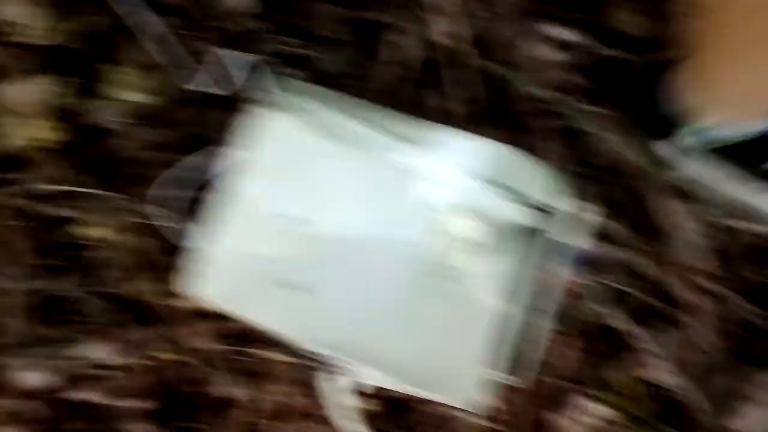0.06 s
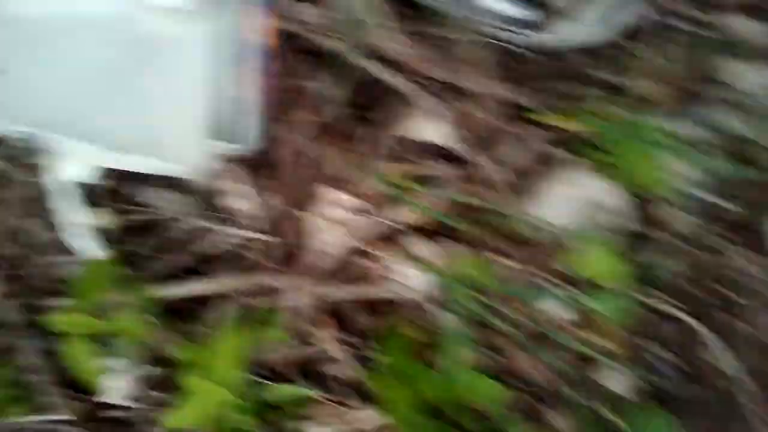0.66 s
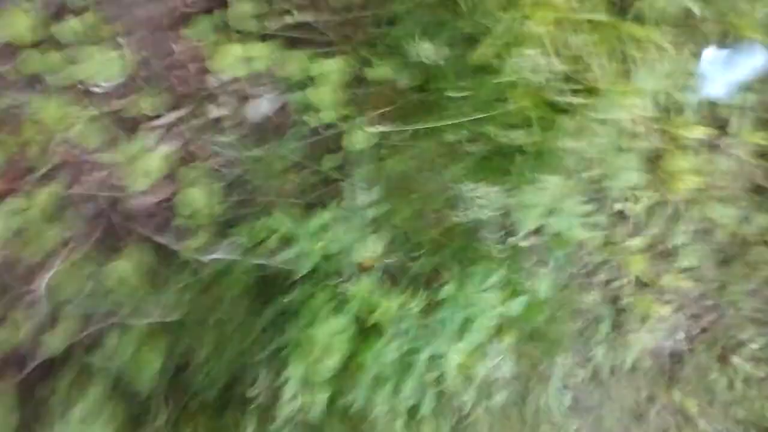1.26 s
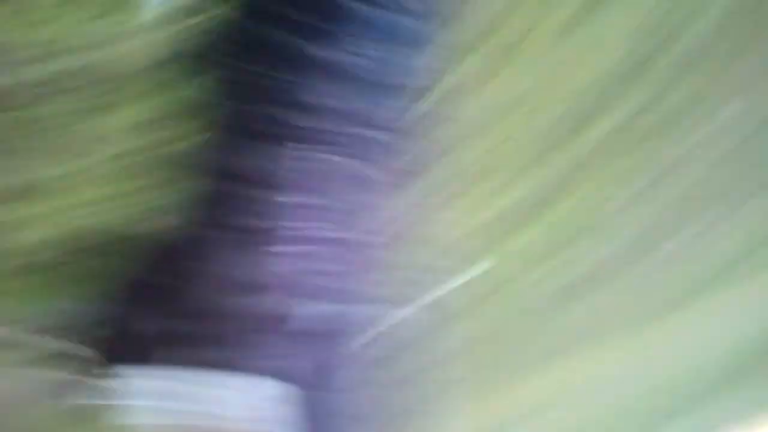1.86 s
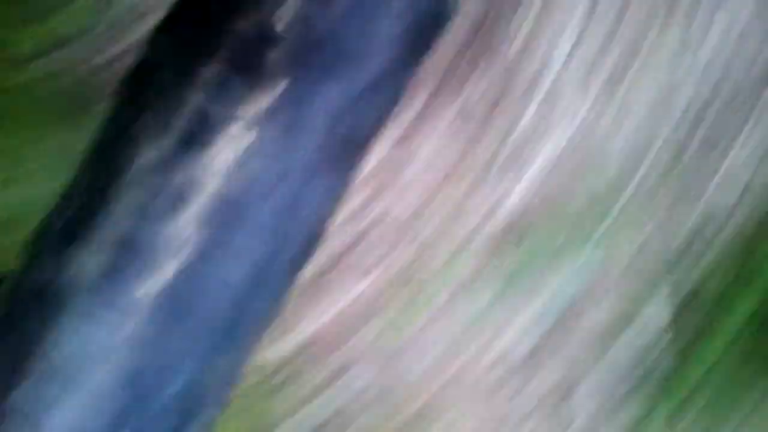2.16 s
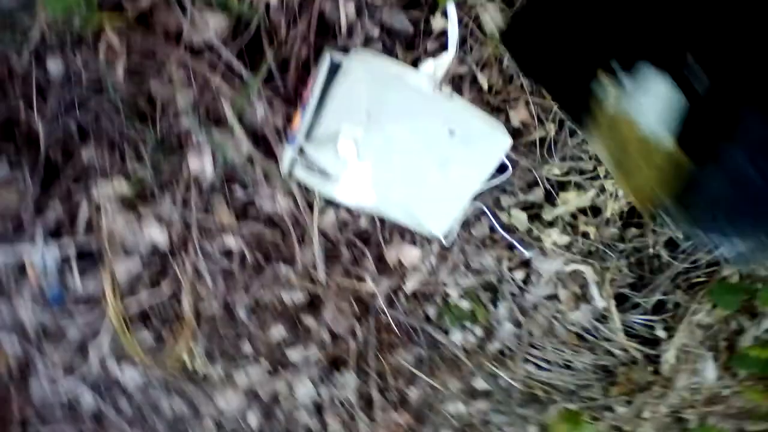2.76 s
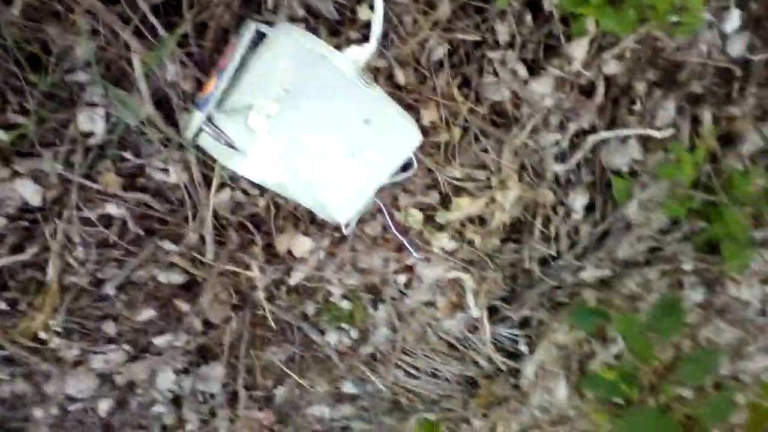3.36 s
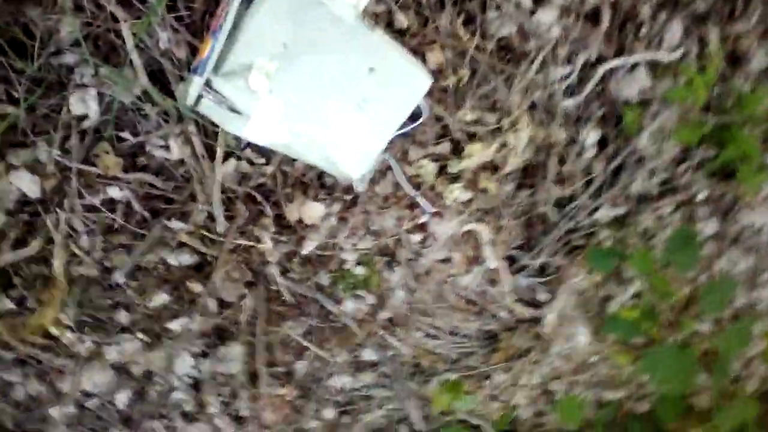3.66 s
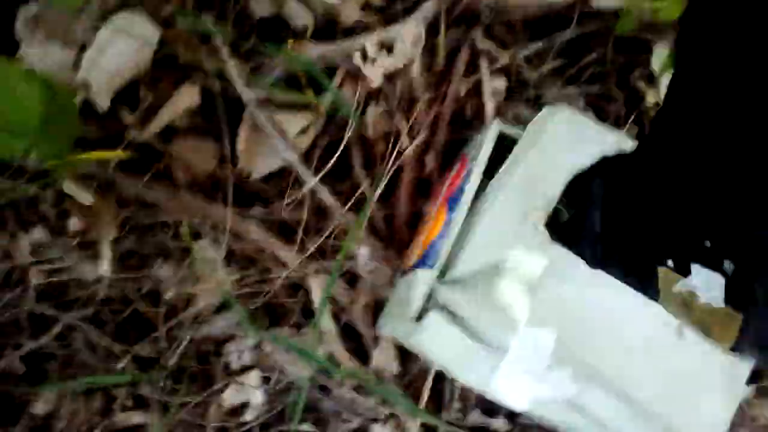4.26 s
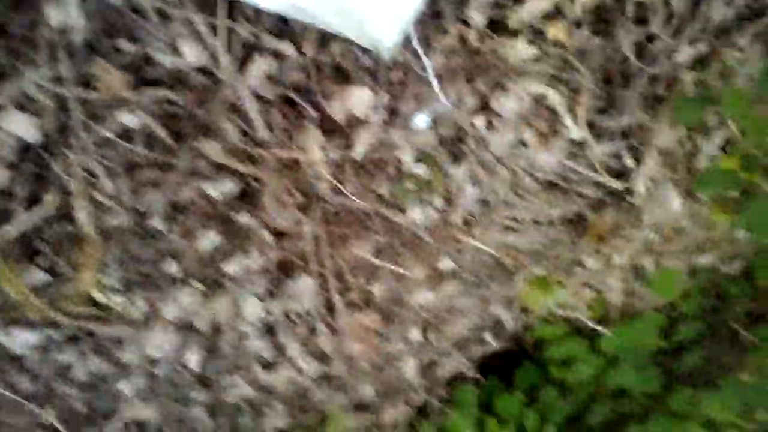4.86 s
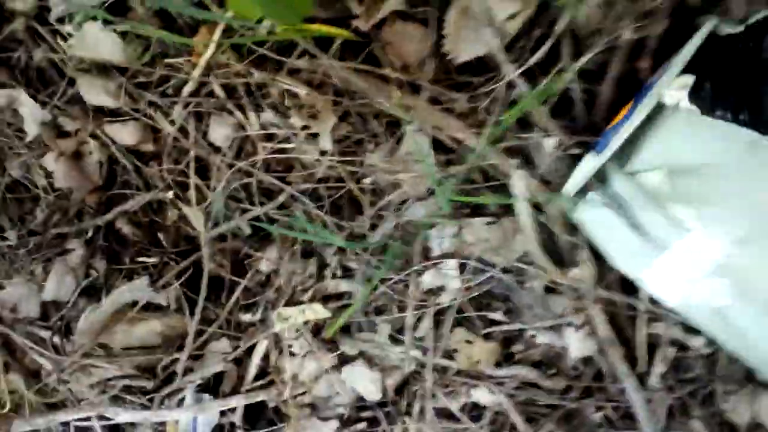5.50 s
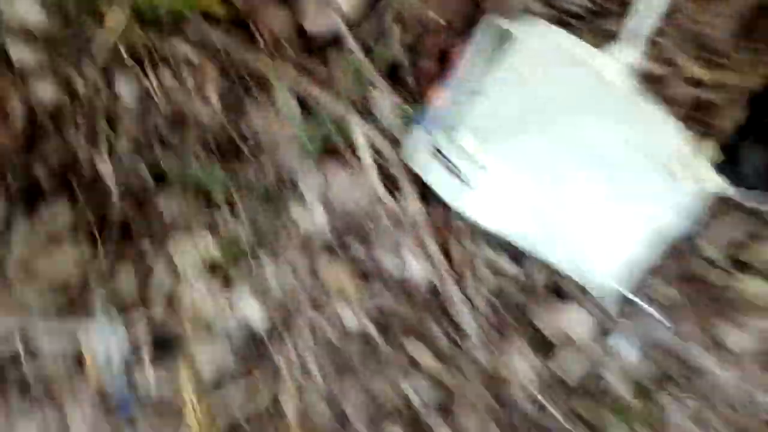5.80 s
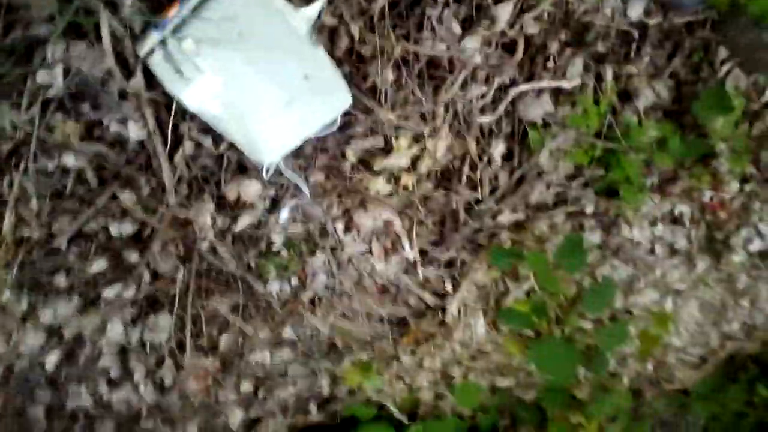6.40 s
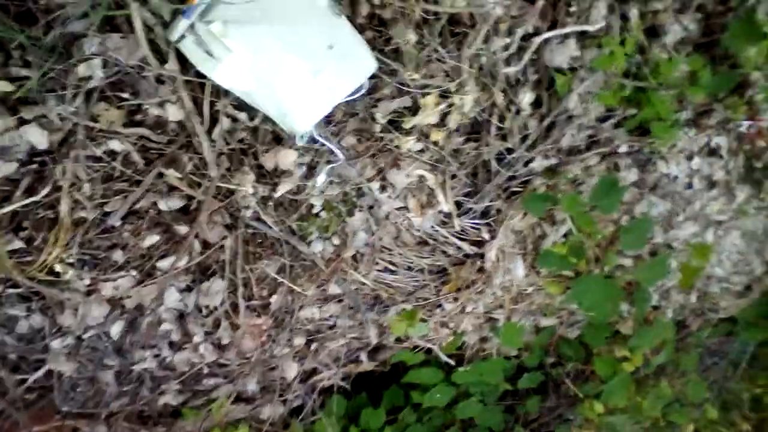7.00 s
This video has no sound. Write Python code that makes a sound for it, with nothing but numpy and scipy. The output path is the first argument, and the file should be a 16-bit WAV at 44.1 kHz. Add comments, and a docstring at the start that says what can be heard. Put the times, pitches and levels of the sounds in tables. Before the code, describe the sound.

After crunching leaves and snapping twigs, two hard cracking stick blows send a hollow box rattling over the ground, with faint traffic behind.

```python
"""A thin-walled box on the ground is struck twice with a stick: its wall buckles, thumps and cracks,
and its damped modes ring. It skids and rattles over the leaf litter and knocks lightly as it settles.
Before the blows, footsteps crackle in dry leaves and snap twigs, and a few dull taps of wood follow.
Trees scatter a short echo, far traffic hums behind them, and a limiter ducks around the two blows."""
import sys
import numpy as np
from scipy import signal
from scipy.fft import rfft, irfft
from scipy.io import wavfile
from scipy.ndimage import uniform_filter1d, minimum_filter1d

SR = 44100
rng = np.random.default_rng(int(sys.argv[2]) if len(sys.argv) > 2 else 0)


def materialize(psi):
    """Save the field psi as 16-bit PCM at rate SR to the path in sys.argv[1].

    A 1-D psi becomes a single channel; in a 2-D psi each row is a channel.
    """
    bounded = np.clip(np.atleast_2d(psi).T, -1, 1)
    quanta = np.round(bounded * 32767).astype(np.int16)
    wavfile.write(sys.argv[1], SR, quanta)


N = 310498

# Far traffic. Each row: time in seconds, engine rumble in dB, tyre rush in dB before a 1 dB lift.
TRAFFIC_LEVELS = [(0, -47.5, -48.5), (.9, -46.5, -47.5), (1.7, -43.5, -45), (2.5, -48.5, -46.5),
                  (3.8, -48.5, -45), (5, -48, -46.5), (7.04, -47.5, -46)]
# Spectra of engine rumble and tyre rush. Each row: frequency in Hz, relative density in dB.
RUMBLE_SPECTRUM = [(22, -14), (38, -23), (52, -31), (72, -4), (95, -2.5), (128, -1.5), (165, -2.5),
                   (270, -5), (350, -11), (550, -25), (1200, -71)]
TYRE_SPECTRUM = [(200, -20), (400, -4.5), (700, 1.5), (1050, 2.5), (1450, -2.5), (2000, -9.5),
                 (3000, -20.5), (6000, -36)]
# Single engines. Each row: start and length in seconds, pitch in Hz, glide in Hz a second, level in dB.
ENGINE_DRONES = [(0, 0.61, 134, 8, -46.5), (1.002, 1.95, 120, 6.5, -50), (3, 3.2, 120.9, 6.5, -48.5),
                 (5.403, 1.32, 116.6, -11.5, -48), (6.201, 1.2, 296.5, -10, -50.5)]
# Echo among the trees. Each row: frequency in Hz, time to decay 60 dB in seconds.
ECHO_DECAY = [(150, 0.046), (600, 0.42), (1200, 0.41), (3000, 0.32), (8000, 0.39)]
# Footsteps. Each row: time of full weight in seconds, level in dB, rise and fall in seconds.
FOOTSTEPS = [(.255, -33.5, 0.056, 0.12), (.415, -30.5, .006, 0.069), (1.28, -47, 0.087, 0.089)]
# Spectra of leaf litter and breaking wood. Each row: frequency in Hz, relative density in dB.
LEAF_SPECTRUM = [(80, -41), (250, -6.5), (600, -5.5), (1150, -2.5), (1700, -6.5), (2400, -3), (3300, -1),
                 (4300, -11.5), (6500, -11), (11000, -13.5), (15500, -17)]
SPLINTER_SPECTRUM = [(80, -36), (300, -17), (700, -4), (1200, -1), (1700, -2.5), (2300, 6.5), (2850, -1),
                     (3450, 1.5), (4400, -6.5), (6500, -8.5), (11000, -16), (15500, -20)]
# Twigs. Each row: start in seconds, level in dB, splinter time in seconds, tilt in dB an octave.
TWIG_SNAPS = [(.2795, -32.5, .0022, 5), (.301, -31.5, 0.0042, 1), (.327, -44, 0.0018, 1),
              (.383, -35, 0.0011, 7), (.4056, -17.5, 0.002, .5), (.4264, -28.5, .0023, -6),
              (.446, -30, 0.0025, 3), (.479, -34, 0.0029, -7.5), (.515, -43, .0018, 5),
              (.608, -36.5, 0.0084, -1.5), (.68, -47.5, 0.0036, -1), (.893, -41, 0.0025, 4.5),
              (1.082, -42.5, 0.0023, 2.5), (1.159, -31.5, 0.0079, -9), (1.169, -38, 0.0026, 4)]
# Dull taps of wood. Each row: start in seconds, level in dB, pitch in Hz.
WOOD_TAPS = [(2.403, -42.5, 480), (3.414, -47, 2190), (3.836, -42, 585), (3.953, -34, 610)]
# Wall and cavity modes. Each row: frequency in Hz, level in dB, time to decay 60 dB in seconds.
BOX_MODES = [(314, -12, 0.032), (384, -17, 0.15), (461, -8, 0.085), (529.4, -3, 0.16), (618, 3, 0.026),
             (746, 0, 0.045), (810, -11, 0.29), (868, -4, 0.07), (927, 1.5, 0.03), (992, -7, 0.22),
             (1078, -4.5, 0.11), (1204, -0.5, 0.042), (1312, -2.5, 0.048), (1540, -16, 0.053),
             (1600, -9, 0.026), (1833, -14.5, 0.1), (2080, -37, 0.17), (2520, -27, 0.13), (2720, -46, 0.06),
             (2720, -20, 0.036), (3470, -15.5, 0.038)]
# Spectra of the pressed-in wall and sharp contact. Each row: frequency in Hz, relative density in dB.
THUMP_SPECTRUM = [(50, -76), (120, -21), (195, -4.5), (260, -10), (360, -8), (520, -8), (1200, -48),
                  (6000, -90)]
CRACK_SPECTRUM = [(300, -76), (900, -2.5), (1500, -3.5), (2250, 0.5), (2550, -2.5), (3050, -1),
                  (3600, -8.5), (4300, -16), (6500, -21), (9000, -28.5), (15500, -43)]
# The box sliding. Each row: start in seconds, level in dB, length in seconds,
# scratch in dB relative to the ring.
BOX_SKIDS = [(4.101, -31, 0.096, -5.5), (4.452, -39, 0.034, -4.5), (5.304, -23.5, 0.19, -14.5),
             (5.662, -43, 0.052, -4)]
# The box landing. Each row: start in seconds, level in dB, crumple time in seconds,
# crack in dB relative to the ring.
BOX_LANDINGS = [(4.135, -31, 0.0079, 1), (4.16, -25.5, 0.0042, -4), (4.181, -30.5, 0.01, -24),
                (4.4397, -26, 0.025, -8), (5.3437, -17, .012, -14), (5.4343, -15.5, .009, -17),
                (5.485, -23, 0.012, -21), (5.513, -28.5, 0.0076, -22), (5.653, -32.5, 0.0043, -12),
                (5.7095, -27, 0.018, -2.5), (5.8157, -32.5, 0.025, 1)]
# The stick's blows. Each row: start in seconds, level in dB, crumple time in seconds,
# thump and crack in dB relative to the ring.
STICK_BLOWS = [(4.0765, 5, 0.012, -7.5, -0.5), (5.2918, 7.5, 0.0099, -10, -4.5)]
# Microphone response. Each row: frequency in Hz, gain in dB.
MIC_RESPONSE = [(6700, -0.5), (8000, -12), (14000, -13), (14900, -0.5)]


def amp(db):
    """Amplitude ratio of a level in decibels."""
    return np.exp(np.asarray(db) * np.log(10) / 20)


def unit(x):
    """Normalisation to an rms of 1."""
    return x / np.sqrt(np.mean(x ** 2) + 1e-20)


def burst(x):
    """Normalisation of a transient to the energy of 10 ms at an rms of 1."""
    return x * np.sqrt(SR / 100 / (np.sum(x ** 2) + 1e-20))


def along(points, hz):
    """Interpolation of (Hz, value) points on a logarithmic frequency axis."""
    freqs, values = np.transpose(points)
    return np.interp(np.log(hz + 1), np.log(freqs + 1), values)


def wobble(rate, size=N):
    """Slow modulation: straight lines through random values, rate of them a second."""
    knots = rng.standard_normal(100)
    return np.interp(np.arange(size) * rate / SR, np.arange(len(knots)), knots)


def coloured(x, points, tilt_db=0):
    """Minimum-phase filtering by a (Hz, dB) shape, tilted tilt_db an octave above 500 Hz."""
    size = 8192
    hz = np.fft.rfftfreq(size, 1 / SR)
    shape_db = along(points, hz) + tilt_db * np.log2(np.maximum(hz / 500, 1))
    cepstrum = irfft(np.log(amp(shape_db)))
    cepstrum[1:size // 2] *= 2  # folding onto positive time makes the filter causal
    cepstrum[size // 2 + 1:] = 0
    response = irfft(np.exp(rfft(cepstrum)))[:size // 2]
    return signal.oaconvolve(x, response)[:len(x)]


def grains(rate, spread_db, size):
    """Shot noise: rate random clicks a second, their levels spread by up to 4 times spread_db."""
    occurs = rng.random(size) < rate / SR
    strength = np.minimum(rng.exponential(size=size), 4)
    return unit(occurs * rng.choice([-1, 1], size) * amp(spread_db * strength))


def add(track, start, sound):
    """Superposition of a sound on a track, from start in seconds."""
    part = track[round(start * SR):][:len(sound)]
    part += sound[:len(part)]


def engines():
    """Periodic firing gives each engine two harmonics, which glide as it pulls or slows."""
    out = np.zeros(N)
    fade_s, overtone_db = 0.25, -13.5
    for start, length, hz, glide, db in ENGINE_DRONES:
        t = np.arange(int(length * SR)) / SR
        pitch = hz + glide * t + 1.56 * wobble(6, size=len(t))
        phase = 2 * np.pi * np.cumsum(pitch) / SR
        fade = np.minimum(np.minimum(t, length - t) / fade_s, 1)
        swell = fade * amp(db + 1.2 * wobble(5.7, size=len(t)))
        add(out, start, swell * (np.sin(phase) + amp(overtone_db) * np.sin(2 * phase)))
    return out


def traffic():
    """Many far engines and tyres add incoherently into swelling noise; a few engines stand out."""
    times, *levels = np.transpose(TRAFFIC_LEVELS)
    rumble_db, tyre_db = [np.interp(np.arange(N) / SR, times, db) for db in levels]
    rumble = amp(rumble_db + 1.5 * wobble(2.7)) * unit(coloured(rng.standard_normal(N), RUMBLE_SPECTRUM))
    tyres = amp(tyre_db + 1 + 0.12 * wobble(6)) * unit(coloured(rng.standard_normal(N), TYRE_SPECTRUM))
    return rumble + tyres + engines()


def tree_echo(x):
    """Scattering from trunks and bushes gives a diffuse tail whose decay depends on frequency."""
    hz, t, noise = signal.stft(rng.standard_normal(SR // 2), SR, nperseg=256)
    decay = amp(-60 * t / along(ECHO_DECAY, hz)[:, None])
    onset = 1 - np.exp(-t / 0.01)
    tail = signal.istft(noise * decay * onset, SR, nperseg=256)[1]
    return signal.fftconvolve(x, tail / np.linalg.norm(tail))[:N]


def leaves():
    """Crackling noise: dead leaves give way in clumps under a shoe, then slowly spring back."""
    t, pressure = np.arange(N) / SR, np.zeros(N)
    stir_db, stir_db_per_s = -22.5, 7
    for peak, db, rise, fall in FOOTSTEPS:
        before, after = np.maximum(peak - t, 0), np.maximum(t - peak, 0)
        easing = np.maximum(np.exp(-after / fall), amp(stir_db - stir_db_per_s * after))
        pressure = np.maximum(pressure, amp(db) * np.exp(-before / rise) * easing)
    crackle = grains(rate=2400, spread_db=3, size=N)
    clumps = amp(2.3 * unit(uniform_filter1d(rng.standard_normal(N), size=250)))
    return pressure * unit(coloured(crackle * clumps, LEAF_SPECTRUM, tilt_db=-2.5))


def twigs():
    """Brittle fracture: a dry twig breaks underfoot in a quick, decaying run of splinters."""
    out, t = np.zeros(N), np.arange(SR // 10) / SR
    for start, db, splinter_s, tilt_db in TWIG_SNAPS:
        fibres = grains(rate=12000, spread_db=-2.5, size=len(t)) * np.exp(-t / splinter_s)
        add(out, start, amp(db) * burst(coloured(fibres, SPLINTER_SPECTRUM, tilt_db)))
    return out


def wood_taps():
    """A soft impact on wood excites one heavily damped resonance."""
    out, t = np.zeros(N), np.arange(SR // 10) / SR
    envelope = np.exp(-t / 0.0034) * (1 - np.exp(-t / 0.0015))
    for start, db, hz in WOOD_TAPS:
        add(out, start, amp(db) * burst(np.sin(2 * np.pi * hz * t) * envelope))
    return out


def box_ring(scatter_db, detune):
    """The impulse response is a sum of damped modes; each spot and dent weights, flips and shifts them."""
    t = np.arange(SR // 6) / SR
    ring = np.zeros(len(t))
    for hz, db, t60 in BOX_MODES:
        weight, shift, side = rng.standard_normal(3)
        envelope = amp(db + scatter_db * weight - 60 * t / t60)
        ring += np.sign(side) * envelope * np.sin(2 * np.pi * hz * (1 + detune * shift) * t)
    return ring


def box_radiation(x):
    """Walls small against the wavelength radiate little deep bass."""
    return signal.sosfilt(signal.butter(N=3, Wn=165, btype="highpass", fs=SR, output="sos"), x)


def box_skids():
    """Forced vibration: twigs and leaves patter against the sliding box and keep its walls ringing."""
    out, t = np.zeros(N), np.arange(SR) / SR
    grip_s, slowing_db_per_s, stop_db_per_s = 0.0043, 11, 238
    settling = amp(-8.5 - 46 * t)  # the litter keeps stirring under the box
    rocking = 2 * np.pi * 5 * t
    for start, db, length, scratch_db in BOX_SKIDS:
        sliding = amp(-slowing_db_per_s * t - stop_db_per_s * np.maximum(t - length, 0))
        level = amp(db) * (1 - np.exp(-t / grip_s)) * np.maximum(sliding, settling)
        patter = grains(rate=2700, spread_db=2.5, size=SR)
        # the walls flex as the box rocks, so their ring shifts between two shapes
        flat = unit(signal.fftconvolve(patter, box_ring(scatter_db=1, detune=0.003))[:SR])
        bent = unit(signal.fftconvolve(patter, box_ring(scatter_db=1, detune=0.02))[:SR])
        ring = np.cos(rocking) * flat + np.sin(rocking) * bent
        scratch = amp(scratch_db) * unit(coloured(patter, CRACK_SPECTRUM))
        snaps = grains(rate=1300, spread_db=3, size=SR)
        crunch = amp(-15) * unit(coloured(snaps, SPLINTER_SPECTRUM))
        add(out, start, level * (ring + scratch + crunch))
    return out


def box_contact(db, crumple_s, thump_db, crack_db):
    """An impulse and a run of tiny bucklings excite the walls, which ring, thump and crack."""
    t = np.arange(SR // 6) / SR
    buckling = grains(rate=6000, spread_db=-1, size=len(t)) * np.exp(-(t / crumple_s) ** 1.26)
    impulse = (t == 0) * np.linalg.norm(buckling)
    force = buckling + 0.81 * impulse
    # a hard blow leaves the stick pressed on the wall, which damps it
    damping = np.exp(-t * 70 * min(amp(db), 1))
    ring = signal.fftconvolve(force, box_ring(scatter_db=1, detune=0.0033) * damping)[:len(t)]
    thump = amp(thump_db) * burst(coloured(impulse, THUMP_SPECTRUM))
    crack = amp(crack_db) * burst(coloured(buckling, CRACK_SPECTRUM))
    return amp(db) * (burst(ring) + thump + crack)


def box_impacts():
    """Buckling under impact: the stick touches dully, the wall gives, the box knocks on the ground."""
    out = np.zeros(N)
    hold_s = 0.0042  # the wall bears the load this long
    for start, db, crumple_s, thump_db, crack_db in STICK_BLOWS:
        add(out, start, box_contact(db - 2, crumple_s=0.0047, thump_db=-20, crack_db=-15))
        add(out, start + hold_s, box_contact(db, crumple_s, thump_db, crack_db))
    for start, db, crumple_s, crack_db in BOX_LANDINGS:
        thump_db = db + 5  # heavier landings sound deeper
        add(out, start, box_contact(db, crumple_s, thump_db, crack_db))
    return out


def scene():
    """Direct sound from the box, taps and feet superposes with its echo and the far traffic."""
    knocks = box_radiation(box_impacts() + box_skids()) + wood_taps()
    feet = twigs() + leaves()
    echo = tree_echo(amp(-21) * knocks + amp(-19) * feet)
    return (knocks + feet + echo + traffic())[None]


def limiter(x, ceiling_db, look_ahead_s, release_db_per_s):
    """Peak limiting: the gain drops just ahead of a peak and recovers at a steady rate in dB."""
    excess_db = np.maximum(20 * np.log10(np.abs(x) + 1e-9) - ceiling_db, 0)
    width = int(look_ahead_s * SR)
    coming_db = -minimum_filter1d(-excess_db, width, origin=-(width // 2))
    recovery_db = release_db_per_s * np.arange(N) / SR
    cut_db = np.maximum.accumulate(coming_db + recovery_db) - recovery_db
    return x * amp(-uniform_filter1d(cut_db, size=160))


def record(dry):
    """Transduction adds hiss and colour; limiting, saturation and a band limit follow."""
    hiss = amp(-52) * rng.standard_normal(N)
    x = coloured(dry[0] + hiss, MIC_RESPONSE)
    x = limiter(x, ceiling_db=1.5, look_ahead_s=0.015, release_db_per_s=312)
    x = x / (1 + x ** 8) ** (1 / 8)  # soft overload
    passband = np.fft.rfftfreq(N, 1 / SR) < 15700
    return irfft(rfft(x) * passband, N)[None]


dry = scene()
out = record(dry)
materialize(out)
```